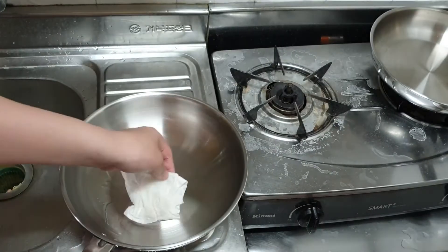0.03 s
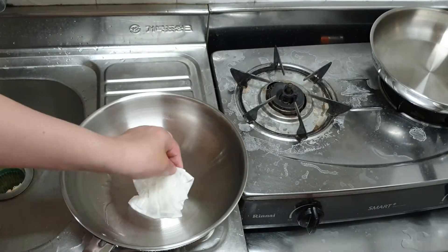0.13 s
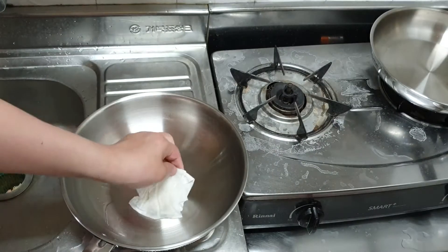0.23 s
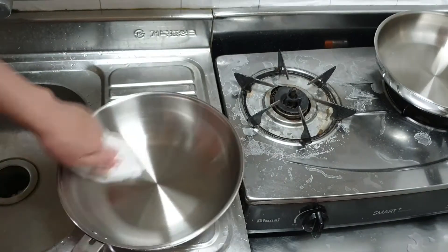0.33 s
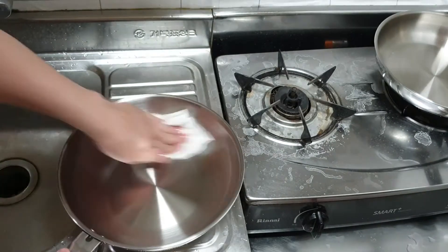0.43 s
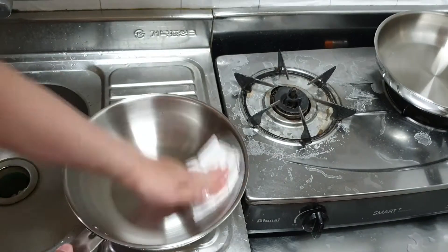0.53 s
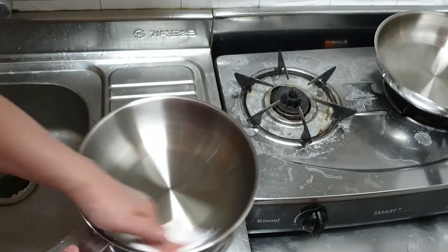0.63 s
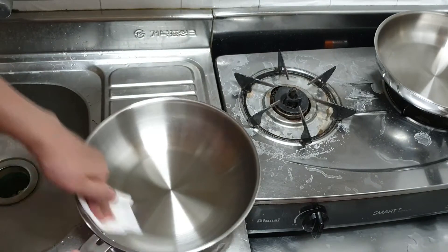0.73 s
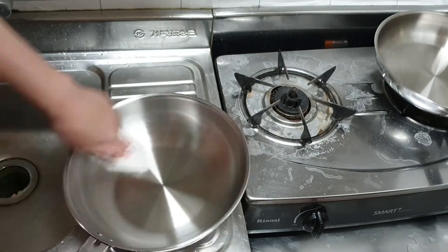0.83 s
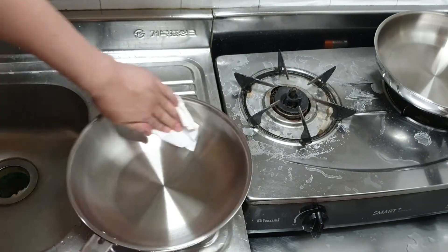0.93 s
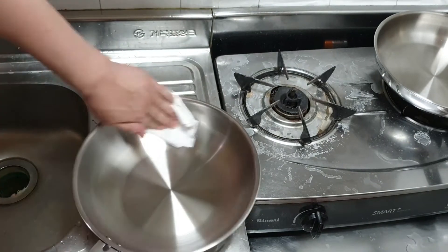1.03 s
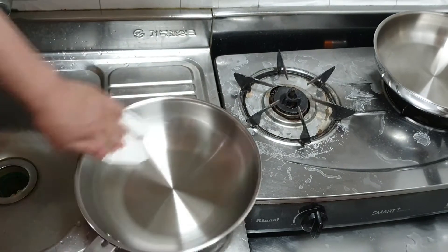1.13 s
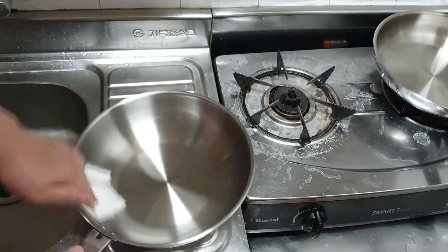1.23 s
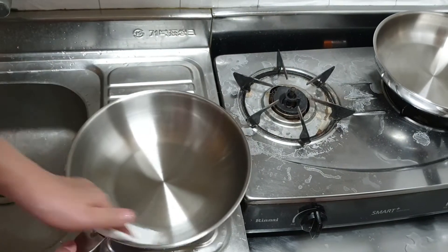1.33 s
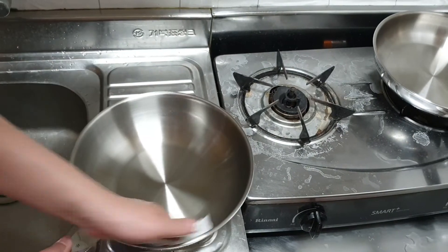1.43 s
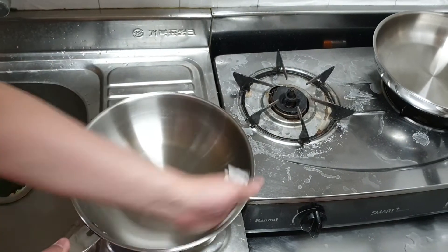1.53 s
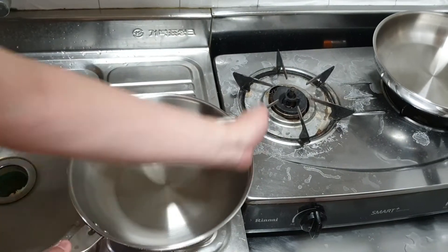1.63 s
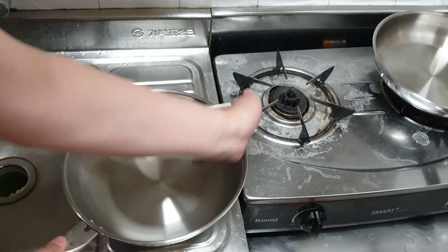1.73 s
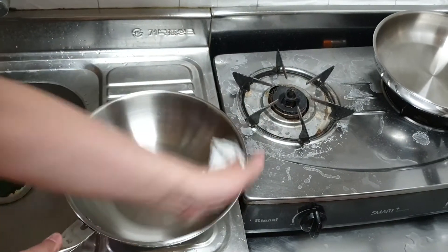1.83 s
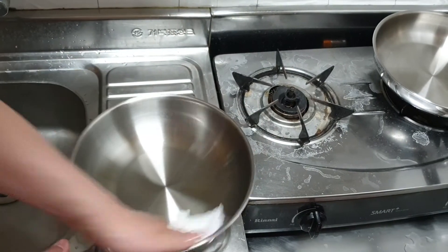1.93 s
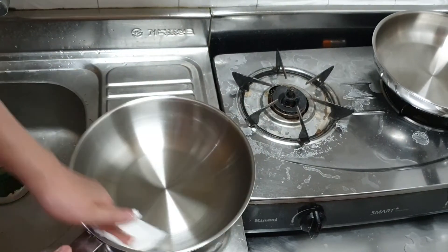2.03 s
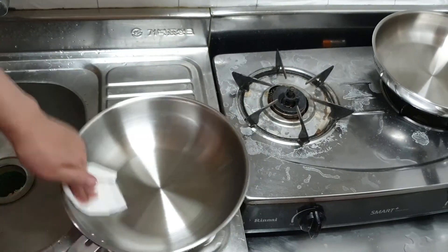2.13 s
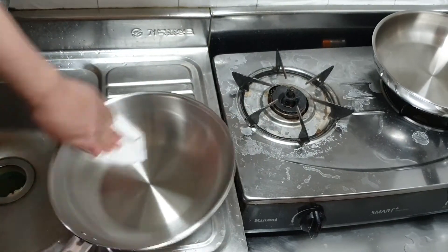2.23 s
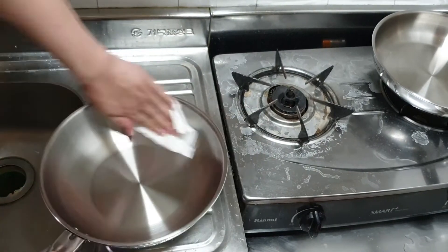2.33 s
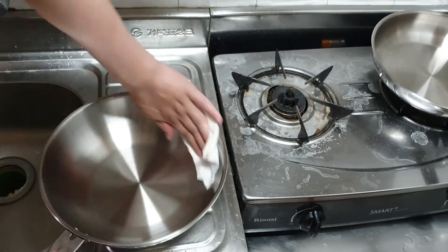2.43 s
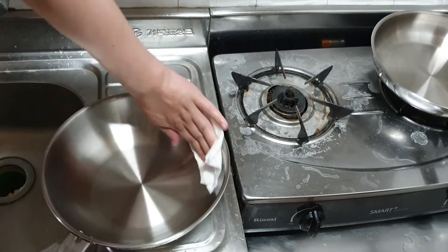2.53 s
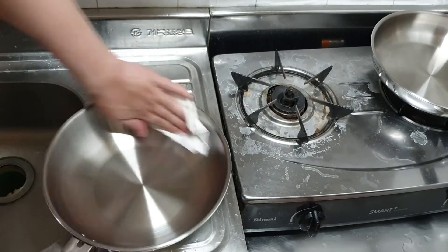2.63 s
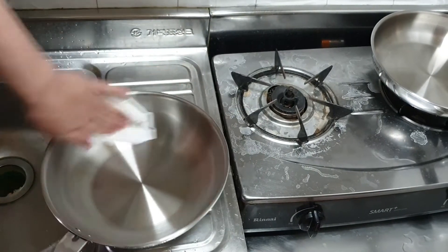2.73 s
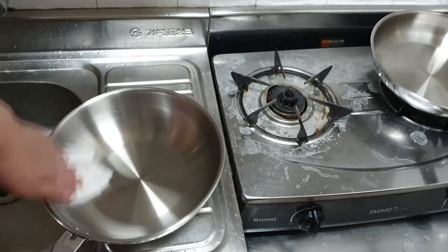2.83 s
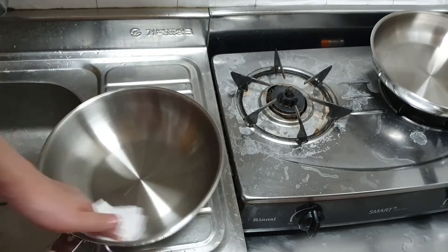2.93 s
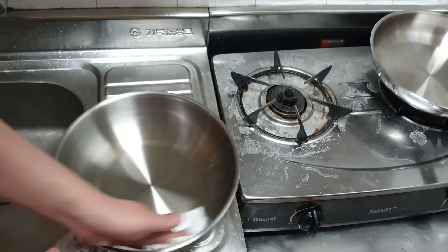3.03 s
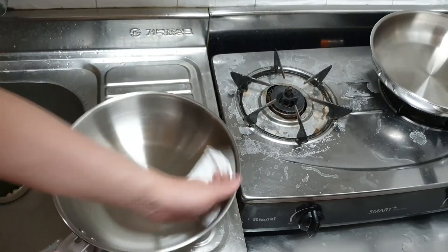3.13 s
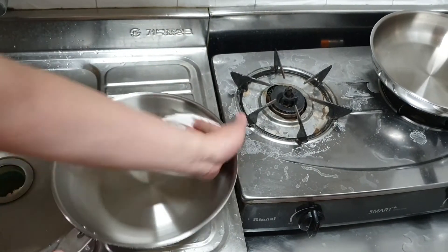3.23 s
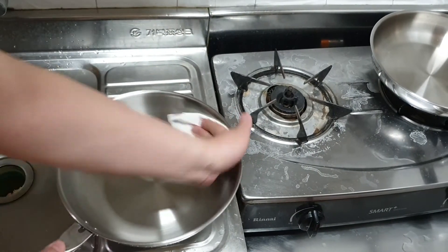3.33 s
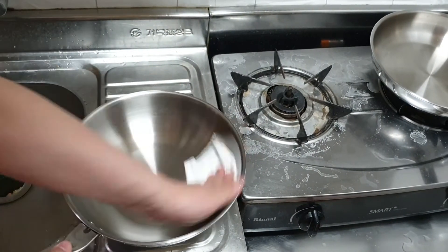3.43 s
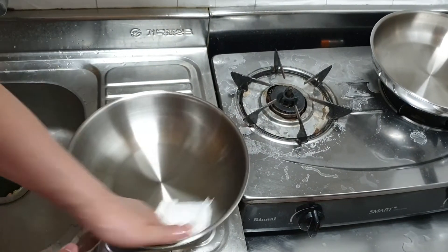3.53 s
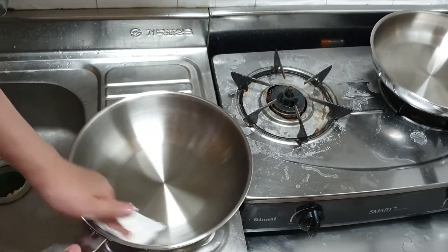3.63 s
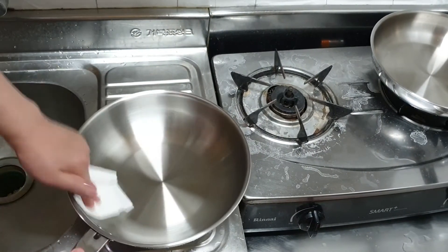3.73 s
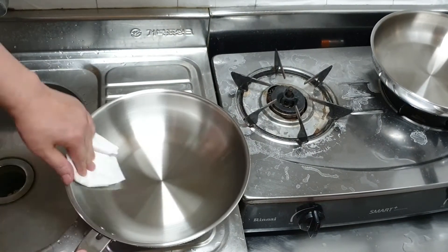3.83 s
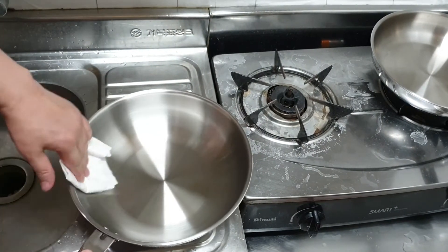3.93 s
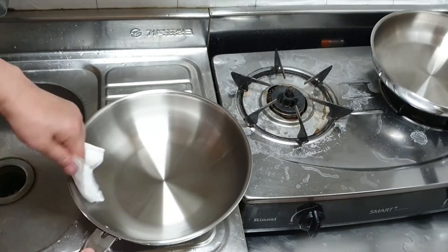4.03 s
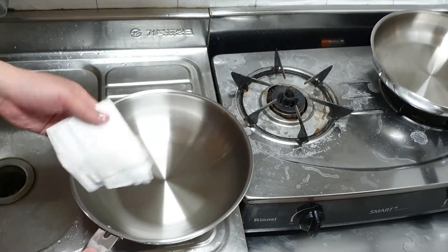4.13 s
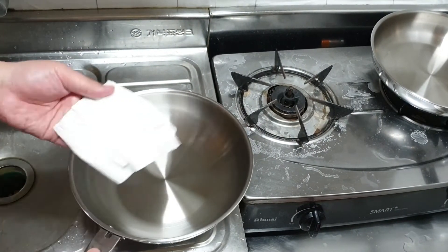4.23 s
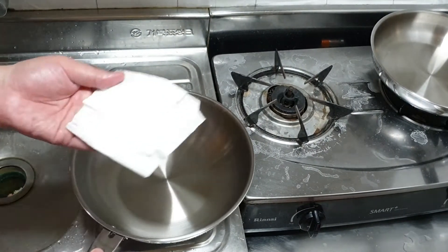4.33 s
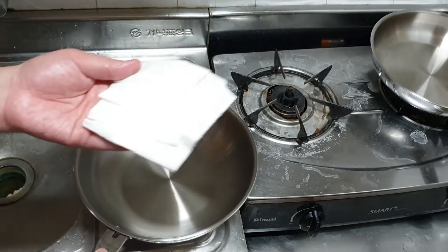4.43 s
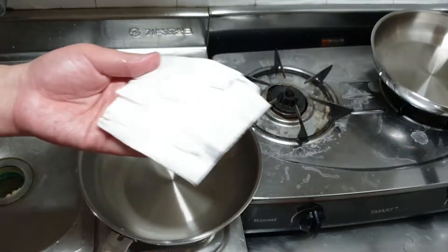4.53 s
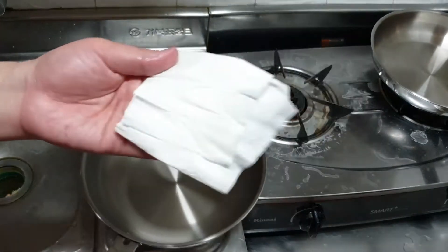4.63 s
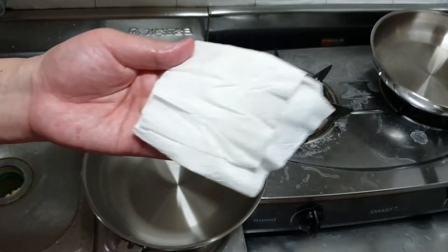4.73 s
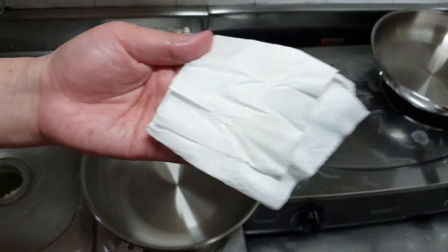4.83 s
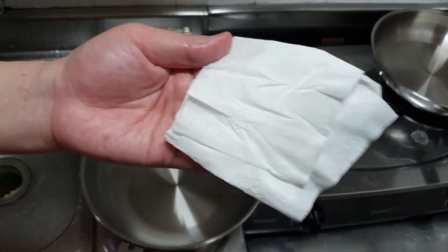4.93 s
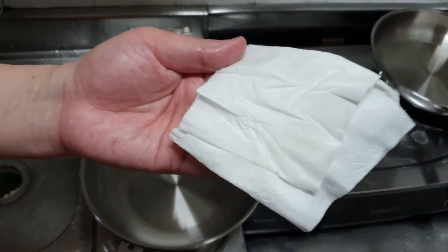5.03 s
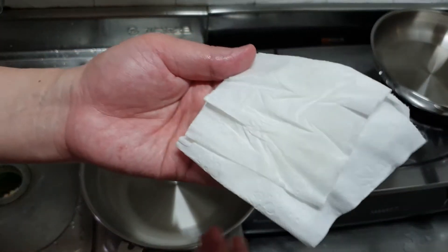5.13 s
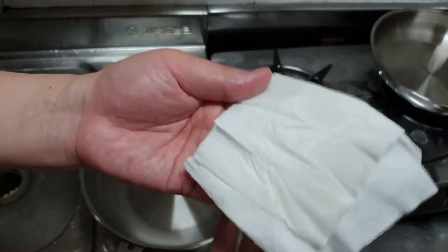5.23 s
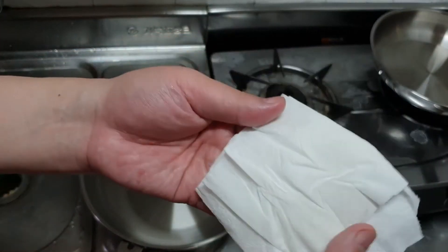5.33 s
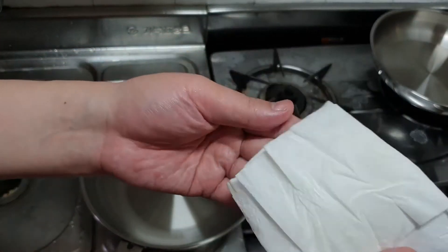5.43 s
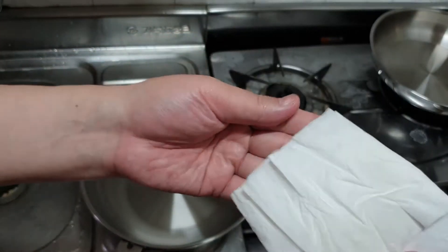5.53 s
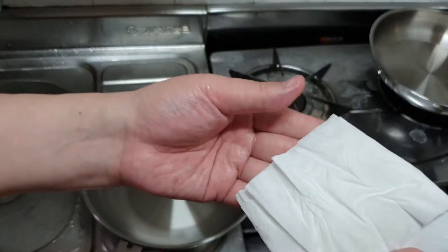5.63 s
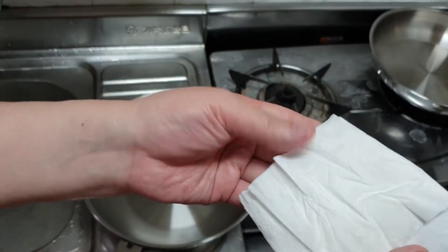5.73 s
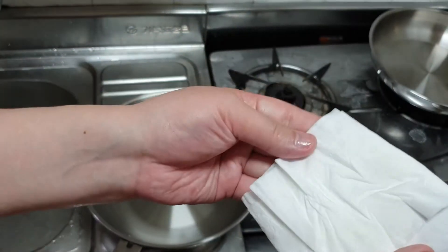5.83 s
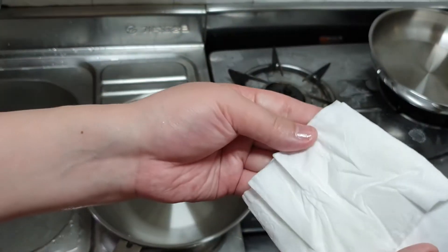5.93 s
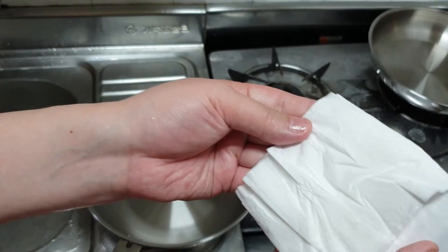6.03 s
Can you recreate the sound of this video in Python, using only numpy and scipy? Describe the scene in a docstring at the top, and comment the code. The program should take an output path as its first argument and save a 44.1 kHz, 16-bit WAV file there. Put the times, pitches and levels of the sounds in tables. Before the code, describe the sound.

Close up in a small kitchen, a dry paper towel hisses and drags in quick irregular strokes inside a thin steel pan. The pan rocks, booming and clanking on a sheet-metal counter. After about four seconds the wiping stops; something slides shut with a hollow wooden thud, then faint paper rustles over a low hum.

```python
"""A paper towel is wiped round a thin steel pan, which rocks and knocks on a sheet-steel kitchen counter.
The towel is swelling noise: a hiss of fibres and a drag on the pan, over a low uneven rumble.
Knocks are fading sine waves (counter boom, pan ring) with a noisy rattle; the room answers them.
Later something slides shut, a rising scuff of noise, among wooden thuds made of fading sine waves.
A mains hum of steady sine waves and a faint hiss of noise lie behind."""
import sys
import numpy as np
from scipy import signal
from scipy.fft import rfft, irfft, next_fast_len
from scipy.io import wavfile
from scipy.ndimage import uniform_filter1d, map_coordinates

SR = 44100
rng = np.random.default_rng(int(sys.argv[2]) if len(sys.argv) > 2 else 0)


def materialize(psi):
    """Save the field psi as 16-bit PCM at rate SR to the path in sys.argv[1].

    A 1-D psi becomes a single channel; in a 2-D psi each row is a channel.
    """
    bounded = np.clip(np.atleast_2d(psi).T, -1, 1)
    quanta = np.round(bounded * 32767).astype(np.int16)
    wavfile.write(sys.argv[1], SR, quanta)


N = 267907  # length in samples


def amp(db):
    """Turn decibels into a plain gain."""
    return 10 ** (np.asarray(db) / 20)


def unit(x):
    """Scale a sound to an average (rms) level of 1."""
    return x / np.sqrt(np.mean(x ** 2) + 1e-20)


def along(points, hz):
    """Read a curve of (pitch_hz, value) points on a log pitch axis."""
    point_hz, value = np.transpose(points)
    return np.interp(np.log(hz + 1), np.log(point_hz + 1), value)


def wobble(rate):
    """A smooth random curve with rate new values a second."""
    values = rng.standard_normal(int(N * rate / SR) + 4)
    return map_coordinates(values, [np.arange(N) * rate / SR])


def filtered(x, response):
    """Change each frequency of x by the gain that response gives for it."""
    m = next_fast_len(x.shape[-1] + SR // 2)
    return irfft(rfft(x, m) * response(np.fft.rfftfreq(m, 1 / SR)), m)[..., :x.shape[-1]]


# How alike left and right are: pitch_hz, likeness (0 to 1)
LIKENESS = [(60, .98), (200, .95), (500, .4), (1000, .15), (3000, .1), (14000, .05)]


def spread(pair, spectrum):
    """Two unrelated signals coloured and mixed into left and right, most alike in the bass."""
    def middle_and_side(hz):
        # the less alike the ears are, the more goes to the side
        turn = np.arccos(np.clip(along(LIKENESS, hz), 0, 1)) / 2
        return amp(along(spectrum, hz)) * [np.cos(turn), np.sin(turn)]

    mid, side = filtered(pair, middle_and_side)
    return unit(np.array([mid + side, mid - side]))


def patchy(depth_db):
    """Two noises whose loudness varies in small random patches of time and pitch."""
    z = signal.stft(rng.standard_normal((2, N)), nperseg=512)[2]
    patches = uniform_filter1d(rng.standard_normal(z.shape[1:]), size=6, axis=0)
    patches = uniform_filter1d(patches, size=8, axis=1)
    return signal.istft(z * amp(depth_db * unit(patches)), nperseg=512)[1][:, :N]


def ringing(modes, t, attack, rough):
    """A struck thing rings in fading sine waves; loose contact makes the phase of higher ones wander."""
    hz, db, t60 = np.transpose(modes)[:, :, None]
    wander = rough * hz / 1000 * np.cumsum(rng.standard_normal((len(modes), len(t))), axis=1)
    # every strike excites the modes a little differently
    level = amp(db + 3 * rng.standard_normal((len(modes), 1)) - 60 * t / t60)
    # the higher modes reach left and right at different phases
    left_right = np.array([1, -1])[:, None, None]
    apart = 1.5 * (hz / 1000) ** 2 * rng.standard_normal((len(modes), 1)) * left_right
    ring = np.sum(level * np.sin(2 * np.pi * hz * t + wander + apart), axis=1)
    ring = ring * (1 - np.exp(-t / attack))
    return ring / np.max(np.abs(ring))


def add(out, s, sound):
    """Lay a sound into out at time s, in seconds."""
    part = out[:, round(s * SR):][:, :sound.shape[-1]]
    part += sound[..., :part.shape[1]]


# Mains hum: pitch_hz, level_db (rms, before it wavers)
HUM = [(59.2, -46.5), (193.8, -71), (242.2, -66), (419.9, -78.5)]
# Colour of the room hiss: pitch_hz, relative_level_db
ROOM_HISS = [(25, -35.5), (42, -5), (60, -3.5), (85, -4), (160, -22.5), (250, -10), (330, -16.5),
             (520, -20), (800, -25), (1100, -40.5), (2000, -43), (5000, -54), (8000, -47.5), (14000, -43.5)]
ROOM_HISS_DB = -57.5


def background():
    """A slightly wavering mains hum, made of sine waves, over a room hiss made of noise."""
    t = np.arange(N) / SR
    level_waver, phase_waver = wobble(3), .25 * wobble(4)  # dB, radians
    hum = sum(np.sqrt(2) * amp(db + level_waver) * np.sin(2 * np.pi * hz * t + phase_waver)
              for hz, db in HUM)
    return hum + amp(ROOM_HISS_DB) * spread(patchy(depth_db=1.5), ROOM_HISS)


# The towel hisses steadily between strokes: time_s, hiss_db
CONTACT = [(0.284, -110), (0.287, -51), (0.5, -54), (1.5, -58.5), (1.67, -61), (1.8, -60.5), (2.4, -53.5),
           (2.48, -66.5), (2.62, -67), (2.69, -58), (3.0, -55), (3.15, -57), (3.2, -59), (4.02, -63.5),
           (4.1, -67.5), (4.21, -85), (4.3, -110)]
# Strokes, rustles and the noisy tail of a knock (near 1.07 s), each a swell:
# fastest_moment_s, rise_s, fade_s, hiss_db, drag_db
SWELLS = [(0.035, 0.024, 0.15, -65.5, -64), (0.353, 0.073, 0.1, -46.5, -40),
          (0.642, 0.046, 0.11, -46.5, -42.5), (0.856, .05, 0.067, -57, -45.5), (1.07, 0.086, 0.1, -70, -48),
          (1.29, 0.063, 0.096, -50.5, -49), (1.47, 0.015, 0.045, -59, -53),
          (1.59, 0.057, 0.053, -61.5, -50), (1.71, 0.057, 0.079, -55, -47),
          (1.952, 0.045, 0.11, -51.5, -45.5), (2.228, 0.051, 0.032, -52, -42.5),
          (2.308, 0.085, 0.094, -44.5, -38), (2.88, 0.1, 0.034, -65.5, -52.5),
          (3.252, 0.037, 0.21, -57.5, -54), (3.408, 0.091, .08, -58, -50.5),
          (3.608, 0.068, 0.071, -55.5, -49.5), (3.82, 0.027, 0.098, -60, -56.5),
          (3.9, 0.078, 0.094, -59.5, -58), (3.998, 0.062, 0.078, -58.5, -57.5),
          (5.454, 0.052, 0.066, -59, -63.5), (5.935, 0.057, 0.14, -69, -70.5)]
CONTACT_DRAG_DB = -3.5  # drag on the pan against the hiss, between swells
EDGE_DB = 14  # drop from the peak of a swell after one rise or fade time
LAND_S = .286  # the towel lands abruptly


def swells():
    """Gains of hiss and drag: the steady contact plus one rise and fade for each swell."""
    t = np.arange(N) / SR
    contact_db = np.interp(t, *np.transpose(CONTACT))
    power = amp([contact_db, contact_db + CONTACT_DRAG_DB]) ** 2
    for s, rise, fade, *db in SWELLS:
        distance = np.where(t < s, (s - t) / rise, (t - s) / fade)
        landed = (t > LAND_S) | (s < LAND_S)  # later swells are silent until the towel lands
        power = power + landed * amp(np.array(db)[:, None] - EDGE_DB * distance ** 1.38) ** 2
    return np.sqrt(power)


# Narrow bands in which the rubbed pan sings: pitch_hz, width_hz, peak_db (each over the plain rubbing noise)
SINGING = [(1465, 22, 5.5), (2494, 84, 6), (4880, 120, 3.5), (7770, 200, 2)]


def singing(hz):
    """The rubbed pan favours a few pitches: a flat gain with narrow peaks."""
    return 1 + sum((amp(db) - 1) / (1 + (2 * (hz - c) / width) ** 2) for c, width, db in SINGING)


# Pan and counter modes in four groups (counter boom, low pan, rim, upper pan):
# pitch_hz, relative_level_db, fade_s (time to fall by 60 dB)
MODES = [
    [(50.7, 4, 0.34), (69, 1, 0.084), (83.7, 3, 0.29), (101.7, -2.5, 0.26), (111.6, 6.5, 0.18),
     (118.7, -1, 0.16), (132, 0, 0.13)],
    [(236, -1, 0.26), (267.7, 2.5, 0.21), (337.4, 0, 0.22), (363.3, -1.5, .2)],
    [(463.5, 1.5, 0.18), (502, -3, 0.16)],
    [(595.7, -3, 0.33), (694.3, -1.5, 0.27), (771.5, -6.5, 0.18), (888, -3.5, 0.26), (1047, -7, 0.18),
     (1172, -12.5, 0.43), (1320, -18.5, 0.017), (1499, -13, 0.27)],
]


def counter_and_pan(hz):
    """Noise stirs every mode of counter and pan, the higher ones less."""
    total = 0
    for k, (c, db, t60) in enumerate(sum(MODES, [])):
        width = 3 / t60  # Hz: a mode that fades fast answers a wider band
        gain = (-1) ** k * amp(db - 4.1 * np.log2(c / 100))
        total = total + gain * 1j * hz * width / (c * c - hz * hz + 1j * hz * width)
    return total


# Colour of the towel's hiss: pitch_hz, relative_level_db
HISS = [(1470, -46), (2500, -19.5), (3310, -8.5), (4110, -5.5), (4690, -6), (7770, -0.5), (8870, -7),
        (13000, -3), (16000, -17.5)]
# Colour of the drag on the pan: pitch_hz, relative_level_db
DRAG = [(240, -35), (400, -26), (501, -0.5), (797, -9.5), (1450, -7), (1690, -12), (1870, -8), (2530, -11),
        (3200, -12.5), (8000, -21), (10400, -24), (17600, -120)]
# Low rumble of the counter, and from 4.8 s on of the wood after the thud: time_s, level_db
RUMBLE = [(0.27, -63), (0.292, -40), (0.51, -32.5), (0.67, -46.5), (1.06, -37), (1.49, -54.5),
          (1.84, -44.5), (2.01, -56.5), (2.38, -32.5), (2.66, -43.5), (3.26, -46), (3.62, -53),
          (4.08, -58.5), (4.7, -69), (4.8, -41), (5.05, -48.5), (5.2, -46.5), (5.481, -59), (6.07, -60)]


def wiping():
    """Paper fibres hiss on the steel and the drag shakes the pan, over a low rumble of many uneven small knocks."""
    hiss_gain, drag_gain = swells()
    rumble_db = np.interp(np.arange(N) / SR, *np.transpose(RUMBLE))
    fibres = amp(1.2 * wobble(250) + 1.2 * wobble(27))
    hiss_noise = filtered(spread(patchy(depth_db=.8), HISS), singing)
    hiss = hiss_gain * unit(fibres * hiss_noise)
    drag_noise = filtered(spread(patchy(depth_db=3.0), DRAG), singing)
    drag = drag_gain * unit(amp(0.5 * wobble(40)) * drag_noise)
    # randomly uneven noise, like many small knocks, runs through counter and pan
    uneven = amp(2.9 * wobble(25)) * rng.standard_normal((2, N))
    rumble = spread(filtered(uneven, counter_and_pan), [(30, 0)])  # one point: no extra colour
    return hiss + drag + amp(rumble_db) * rumble


# Colour of rattle and crack together: pitch_hz, relative_level_db
CLATTER = [(410, -38), (700, -13.5), (1800, -9.5), (2240, -12.5), (2460, -11), (4490, -14.5), (7690, -13),
           (13100, -26.5), (16000, -39)]
# a crack weaker than usual against the rattle also makes the rattle duller
DULLING, USUAL_CRACK_DB = 0.68, -8.5


def rattle(t, dull_db, bright_db, slow, fast):
    """Loose contact as noise: a dull rattle and a bright crack (slow, fast: seconds to fall by 60 dB)."""
    body, crack = [spread(rng.standard_normal((2, len(t))), CLATTER) for _ in range(2)]
    brightness_db = DULLING * (bright_db - dull_db - USUAL_CRACK_DB)
    corner_hz = 4000 * amp(np.clip(brightness_db, -9, 3))
    low_share = lambda hz: 1 / (1 + (hz / corner_hz) ** 2)
    body = unit(filtered(body, low_share))
    crack = unit(filtered(crack, lambda hz: 1 - low_share(hz)))
    rise = 1 - np.exp(-t / .001)
    return rise * (amp(dull_db - 60 * t / slow) * body + amp(bright_db - 60 * t / fast) * crack)


# The pan knocks on the counter:
# time_s, favoured_boom_pitch_hz, boom_db, pan_ring_db, rim_ring_db, rattle_db, crack_db
KNOCKS = [(0.288, 110, -33.5, -48, -52.5, -56.5, -62), (0.425, 124, -6, -14, -13.5, -21.5, -31.5),
          (0.448, 135, -15, -31.5, -42, -53.5, -56), (0.667, 110.8, -31.5, -51.5, -49.5, -46.5, -58),
          (0.905, 94.2, -26, -33.5, -43, -37, -46.5), (0.925, 85.7, -13.5, -22, -16.5, -23.5, -31),
          (0.964, 133, -16.5, -21, -19.5, -28, -35.5), (0.994, 108, -15, -38.5, -63.5, -27, -37),
          (1.391, 62, -38, -49, -36.5, -63, -72), (1.496, 108.6, -37, -64, -57, -69, -68),
          (1.612, 58, -35, -51, -42, -47, -81), (1.671, 137, -27.5, -36, -34.5, -45, -73),
          (1.698, 62, -25, -43, -63, -50.5, -52), (1.749, 102, -33, -56, -43, -49, -52),
          (1.79, 107, -30, -41, -38, -49.5, -56), (1.851, 105, -30, -57, -44, -56, -56),
          (2.206, 96.9, -33.5, -38, -39.5, -49, -50), (2.298, 109, -29, -34, -36, -42.5, -51),
          (2.354, 114, -10, -16, -18, -22, -42), (2.398, 58.4, -23.5, -25, -27.5, -37.5, -58),
          (2.439, 106, -22, -49, -42.5, -60, -70), (2.509, 108, -47, -40.5, -39.5, -51, -68.5),
          (2.587, 106.6, -23.5, -49, -49, -76, -67), (2.697, 61.9, -32, -37.5, -30.5, -47.5, -63.5),
          (2.765, 111, -18.5, -23.5, -29, -29, -54), (2.799, 118, -34.5, -31.5, -59, -49.5, -59),
          (2.96, 105, -43.5, -54, -44.5, -65, -71), (3.014, 119, -23, -23, -17.5, -21, -25.5),
          (3.056, 57.5, -19.5, -26, -54, -30.5, -43), (3.074, 56.5, -40.5, -32.5, -56, -50, -59),
          (3.209, 102, -28, -41, -45, -45.5, -64), (3.387, 114, -34.5, -48, -40.5, -49, -56),
          (3.449, 61.9, -46, -56, -46, -68.5, -68), (3.855, 105, -32.5, -46, -35.5, -42, -63),
          (3.901, 102.7, -29.5, -40.5, -40.5, -48.5, -61), (3.94, 101.3, -34.5, -40, -44.5, -47, -59),
          (4.03, 110, -38, -49.5, -47, -75, -69), (4.327, 67.6, -39, -58, -61, -77, -82)]
RING_ATTACK_S, RING_ROUGH = .004, .095
UPPER_RING_DB = 0  # the pan's upper modes against its low ones


def knocks():
    """Each knock booms the counter, rings the pan and rattles."""
    out, t = np.zeros((2, N)), np.arange(SR // 3) / SR
    for s, boom_hz, boom_db, pan_db, rim_db, rattle_db, crack_db in KNOCKS:
        # the spot that is struck favours the counter modes near one pitch
        low = [(hz, level - 35 * abs(np.log2(hz / boom_hz)), t60) for hz, level, t60 in MODES[0]]
        boom = amp(boom_db) * ringing(low, t, attack=0.017, rough=0.13)
        ring_db = pan_db, rim_db, pan_db + UPPER_RING_DB
        ring = sum(amp(level) * ringing(modes, t, RING_ATTACK_S, RING_ROUGH)
                   for modes, level in zip(MODES[1:], ring_db))
        add(out, s, boom + ring + rattle(t, rattle_db, crack_db, slow=0.17, fast=0.061))
    return out


# How long the room rings: pitch_hz, fade_s (time to fall by 60 dB)
KITCHEN = [(150, 0.42), (1000, 0.21), (4000, 0.042), (12000, 0.15)]


def kitchen(x):
    """The room answers each third of a second with its own noise tail, its fading set for each pitch."""
    out, step = np.zeros((2, N)), SR // 3
    for start in range(0, N, step):
        hz, t, z = signal.stft(rng.standard_normal((2, SR // 2)), SR, nperseg=256)
        fading = amp(-60 * t / along(KITCHEN, hz)[:, None])
        tail = signal.istft(z * fading, SR, nperseg=256)[1]
        tail = tail / np.linalg.norm(tail[0])
        answer = signal.fftconvolve(x[None, start:start + step], tail, axes=1)
        add(out, start / SR + .004, answer)  # the room answers 4 ms late
    return out


# Something slides shut: time_s, level_db (before it flickers)
SLIDE = [(4.39, -76), (4.428, -65.5), (4.498, -65.5), (4.666, -46.5), (4.724, -45.5), (4.728, -47.5)]
# Colour of the sliding noise: pitch_hz, relative_level_db
SCUFF = [(180, -58), (300, -28), (507, -3), (606, -5.5), (1670, -10), (2440, -8), (7920, -20.5),
         (15000, -35.5)]


def slide():
    """Sliding as flickering noise: a rising scuff that stops dead at the thud."""
    level_db = np.interp(np.arange(N) / SR, *np.transpose(SLIDE), left=-120, right=-120)
    return amp(level_db + 1.175 * wobble(29.78)) * spread(patchy(depth_db=2.5), SCUFF)


# Wooden thuds: time_s, ring_db (before the treble cut), rattle_db, crack_db
THUDS = [(4.426, -45.5, -65, -68.5), (4.729, -19.5, -32, -36.5), (4.809, -34, -63, -62),
         (5.073, -42.5, -67, -110), (5.192, -44, -73, -110), (5.308, -46, -72.5, -110)]
# Modes of the hollow wood: pitch_hz, relative_level_db, fade_s (time to fall by 60 dB)
WOOD = [(184.6, -3.5, 1), (225, -0.5, 0.3), (310, -2.5, 0.63), (394, 1, 0.34), (510.4, 3, 0.31),
        (668, 1, 0.42), (769, 0.5, 0.35), (831.5, 3.5, .4), (849, -1.5, 0.15), (1103, -16, 0.37),
        (1450, -44.5, 0.13), (1846, -35, 0.3)]
HARD_DB, HARD_ATTACK_S, SOFTENING = -15, .001, 0.21  # thuds weaker than HARD_DB start more slowly
WOOD_TOP_HZ = 1700  # the wood's ring holds little above this


def thuds():
    """Hollow wood is struck: its modes ring, with a rattle and a short crack."""
    out, t = np.zeros((2, N)), np.arange(SR // 2) / SR
    treble_cut = signal.butter(2, WOOD_TOP_HZ, fs=SR, output="sos")
    for s, db, rattle_db, crack_db in THUDS:
        crack = rattle(t, rattle_db, crack_db, slow=0.24, fast=0.12)
        attack = HARD_ATTACK_S * amp(SOFTENING * (HARD_DB - db))
        ring = signal.sosfilt(treble_cut, ringing(WOOD, t, attack, rough=.1))
        add(out, s, amp(db) * ring + crack)
    return out


def scene():
    """Knocks and thuds with the room's answer to them, plus wiping, slide and background."""
    hits = knocks() + thuds()
    # the bass is carried by the counter, so the room's answer has little of it
    room = filtered(kitchen(hits.mean(axis=0)), lambda hz: np.clip(hz / 600, 0, 1))
    return hits + amp(-6.5) * room + wiping() + slide() + background()


# Left against right: pitch_hz, left_minus_right_db
BALANCE = [(60, -4.5), (240, -1), (950, -2.5), (3770, -3), (15000, 0)]
TOP_HZ = 15850  # nothing is kept from here up


def record(dry):
    """The right microphone is louder below the top treble, the left hears the bass first; deep bass is cut."""
    half = np.array([[.5], [-.5]])  # each side takes half of the difference

    def microphones(hz):
        lead_s = 8e-5 / (1 + (hz / 700) ** 2)
        return amp(half * along(BALANCE, hz)) * np.exp(2j * np.pi * hz * half * lead_s)

    bass_cut = lambda hz: (1j * hz / (38 + 1j * hz)) ** 2
    return filtered(dry, lambda hz: microphones(hz) * bass_cut(hz) * (hz < TOP_HZ))


dry = scene()
out = record(dry)
materialize(out)
```